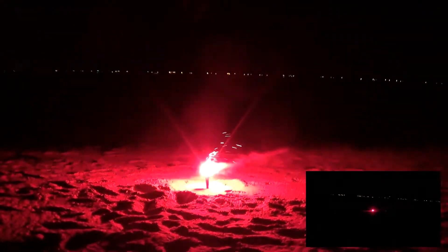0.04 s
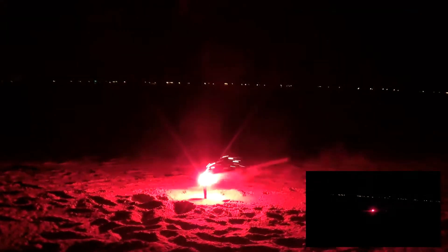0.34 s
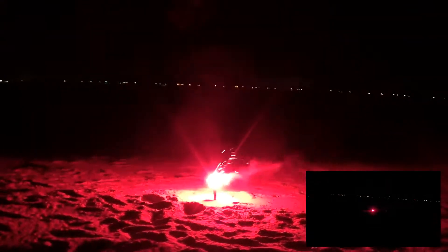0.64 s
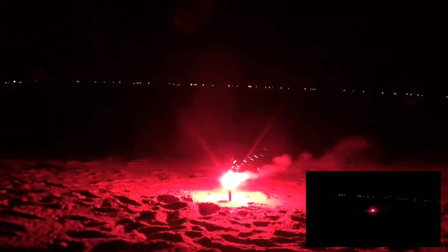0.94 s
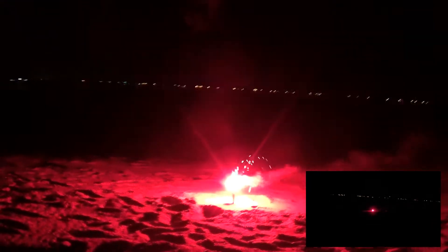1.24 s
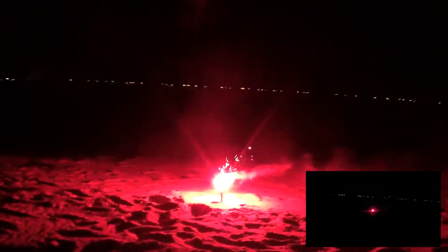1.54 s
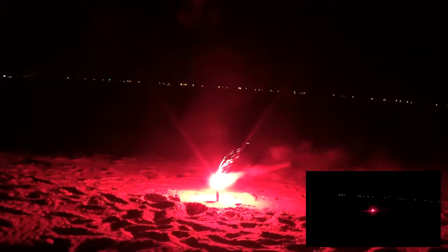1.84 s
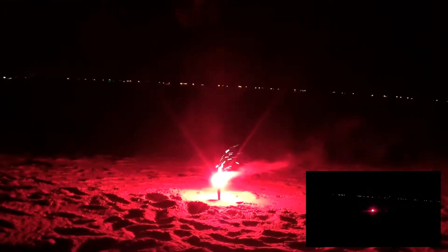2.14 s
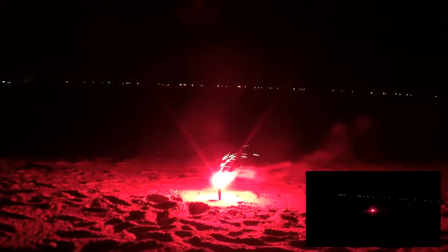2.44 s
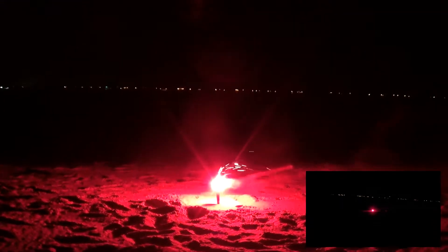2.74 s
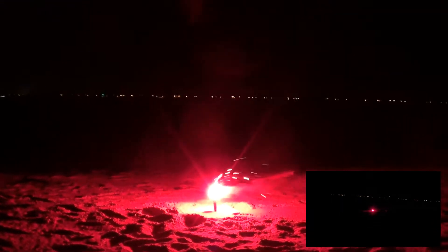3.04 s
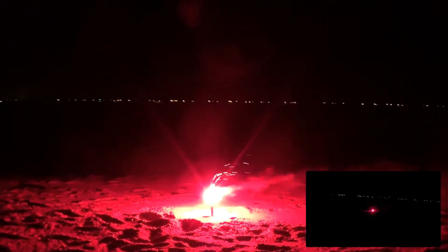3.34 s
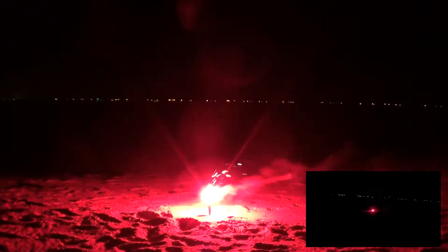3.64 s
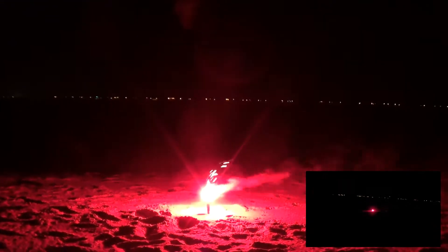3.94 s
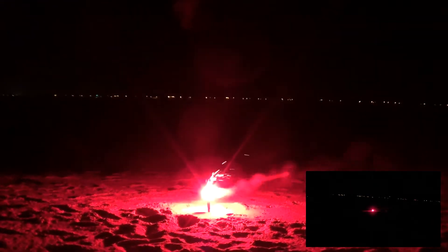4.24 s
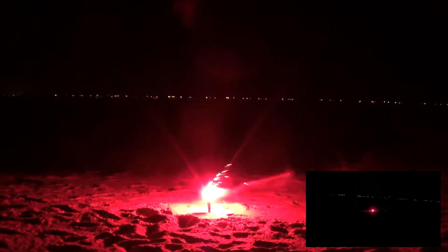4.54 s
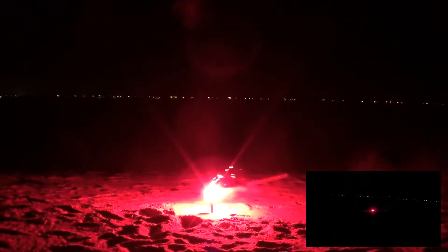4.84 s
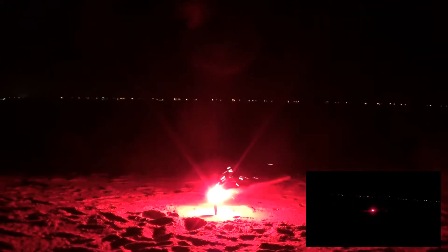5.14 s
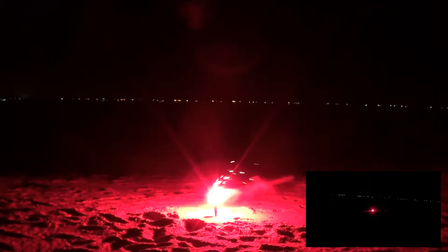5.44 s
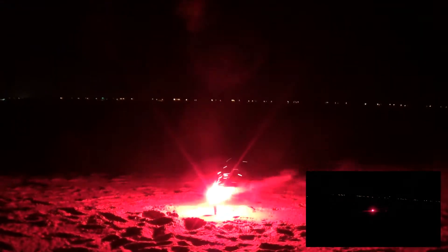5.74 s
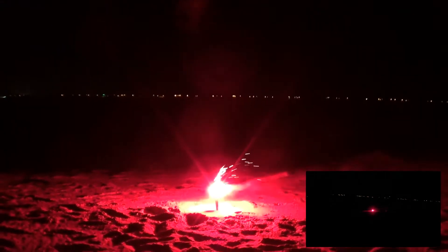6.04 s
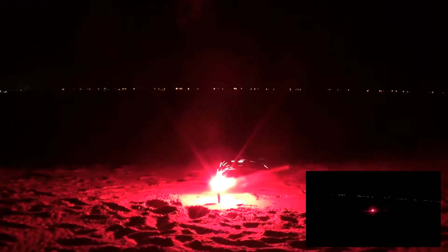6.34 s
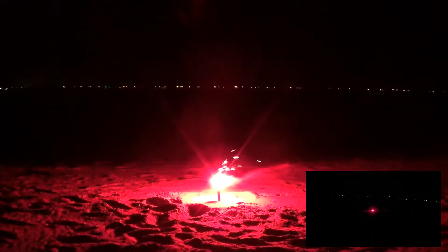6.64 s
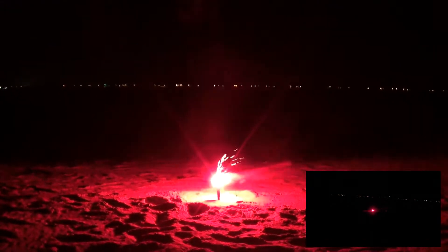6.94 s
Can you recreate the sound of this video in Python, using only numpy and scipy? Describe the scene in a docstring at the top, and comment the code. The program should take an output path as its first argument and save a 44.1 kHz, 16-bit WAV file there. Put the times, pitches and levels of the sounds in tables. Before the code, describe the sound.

A flare burns straight ahead, a few metres away on open sand, for about seven seconds. It gives a continuous rushing hiss with a fine, high fizz, brief sizzling flurries and sharp, irregular pops, thickest between about 1.6 and 3 seconds. Low wind rumble buffets the microphone in uneven gusts, spreading wide around the centred flare. In the first second there are two tiny gritty scuffs and a faint, breathy whistle that peaks near 0.7 seconds. A strong gust hits at about 1 second. The wind is heaviest from 3 to 5 seconds, peaking near 3.3 and 4.2 seconds with a grainy, rasping edge, while the hiss sinks slightly and the pops thin out. After about 5.8 seconds the wind drops to a few short thumps, and the hiss and crackle come forward again. One last brief gust bumps the microphone at 7 seconds.

```python
"""Hiss and fizz of a road flare a few metres ahead, over low wind rumble; open sand, night.
The gas jet hisses and sounds the tube mouth. Molten slag fizzes, boils up in flurries, spits sharp pops.
Gusts buffet the two microphone ports: the harder they blow, the higher the rumble reaches, until it
rasps. A faint whistle and two brief scuffs sound early on. A limiter ducks the mix on big thumps."""
import sys
import numpy as np
from scipy import signal
from scipy.fft import rfft, irfft
from scipy.io import wavfile
from scipy.ndimage import uniform_filter1d, minimum_filter1d

SR = 44100
rng = np.random.default_rng(int(sys.argv[2]) if len(sys.argv) > 2 else 0)


def inscribe(sig):
    """Save sig as 16-bit PCM at rate SR to the path in sys.argv[1].

    A 1-D sig is mono; a 2-D sig holds one channel per row.
    Samples are clipped to [-1, 1] before scaling.
    """
    pcm = np.round(np.clip(np.atleast_2d(sig).T, -1, 1) * 32767)
    wavfile.write(sys.argv[1], SR, pcm.astype(np.int16))


N = 312228
TIME_S = np.arange(N) / SR
STIFF_GUST_DB = -28.5   # reference buffeting

# gusts at the ports: start t/s, length/s, buffeting/dB, extra thump/dB
GUSTS = [(-0.02, 0.12, -46.5, 6.5), (0.105, 0.032, -36, -4.5), (0.235, 0.084, -29, 1.5),
         (0.341, 0.13, -25, -0.5), (0.512, 0.065, -30, -1), (0.774, 0.156, -30, 1.5),
         (0.919, 0.19, -22.5, -0.5), (1.137, 0.201, -31, -0.5), (1.384, 0.22, -33, 1.5),
         (1.676, 0.087, -34, 0.5), (1.795, 0.022, -39.0, 2), (1.927, 0.149, -27.5, 1.5),
         (2.108, 0.26, -29, 0), (2.267, 0.45, -27.5, 1), (2.794, 0.074, -24, -0.5),
         (3.021, 0.21, -27.0, -0.5), (3.177, 0.24, -18.5, -2.5), (3.438, 0.43, -24.5, -3.5),
         (4.011, 0.053, -28.5, -1.5), (4.116, 0.27, -21.5, -0.5), (4.41, 0.45, -25.0, -0.0),
         (4.752, 0.24, -26, -1), (4.987, 0.19, -37, 0), (5.178, 0.039, -30, 0), (5.287, 0.093, -32, -2.5),
         (5.388, 0.13, -29.5, 2), (5.528, 0.047, -32, -2.5), (5.618, 0.025, -36.5, -7),
         (5.695, 0.035, -23, -5), (5.775, 0.014, -28, 4), (5.855, 0.028, -44.5, -2.5),
         (6.202, 0.028, -34.5, 7), (6.295, 0.14, -51.5, 6.5), (6.335, 0.025, -35.5, -15.5),
         (6.575, 0.035, -41.5, 6), (6.729, 0.07, -39.5, 4), (6.872, 0.12, -43, -1),
         (6.982, 0.038, -25.5, 2)]
# eddy noise in a strong gust: f/Hz, density/dB
EDDY_SPECTRUM = [(25, -11), (60, -1.5), (130, 3), (220, -1.5), (330, -7), (500, -17), (900, -29),
                 (1800, -39.5), (2600, -44.5), (3600, -57), (6000, -61)]
# wind width: f/Hz, side minus mid/dB
WIND_WIDTH = [(60, -10), (120, -7), (200, -3.5), (330, 2), (550, 3.5), (1300, 4.5), (2500, -45),
              (4000, -58), (7000, -18)]
# sharpest eddies across the ports: centre t/s, level/dB, length/s, top f/Hz
SHARP_EDDIES = [(.261, -33, 0.01, 1900), (.41, -25.5, .007, 2280), (.452, -32, .01, 2280),
                (.951, -25.5, 0.015, 1970), (.989, -28, 0.011, 2680), (1.048, -24.5, 0.041, 3470),
                (2.021, -30, 0.013, 2540), (2.068, -35, 0.013, 2400), (2.401, -26, 0.0051, 2580),
                (2.864, -28, 0.023, 1990), (3.125, -27, 0.0085, 2320), (3.257, -30, 0.028, 3160),
                (3.295, -28.5, 0.029, 3570), (3.32, -25, 0.0065, 3880), (3.363, -27, 0.013, 4900),
                (3.407, -27, 0.013, 4100), (3.614, -25, 0.023, 3040), (3.75, -26.5, 0.021, 3180),
                (4.066, -28.5, 0.01, 2450), (4.29, -32, 0.24, 3050), (4.767, -30, 0.026, 3000),
                (4.857, -27, 0.0055, 2620), (5.472, -26, 0.019, 2000), (6.224, -32, 0.0045, 1520)]
# gritty scuffs: centre t/s, level/dB, length/s
SCUFFS = [(0.416, -35.5, .018), (0.71, -33, 0.0053)]
# hiss envelope: t/s, level/dB
HISS_LEVELS = [(0.03, -39.5), (0.75, -38.5), (0.97, -40.5), (1.18, -42.5), (1.34, -42.5), (1.75, -40.5),
               (2.51, -41.5), (2.94, -42.5), (3.12, -40), (3.29, -46), (3.94, -45), (4.47, -46.5),
               (5.95, -43), (6.35, -41), (6.5, -42), (7.05, -39.5)]
# brief hiss dips: centre t/s, gain/dB, length/s
HISS_DIPS = [(1.075, -5, 0.068), (2.47, -8, 0.018), (3.164, -6.5, 0.044), (3.894, -6, 0.027),
             (4.575, -8, 0.036)]
# gas jet: f/Hz, density/dB
JET_SPECTRUM = [(150, -28), (500, 2.5), (1000, -1), (1600, -1.5), (2600, 1.5), (3900, 0), (4700, -4.5),
                (6000, -6.5), (7200, -4), (8300, 0.5), (9300, 1), (10500, 0), (12500, -14), (16000, -24)]
# flare wash from the sides: f/Hz, density/dB
WASH_SPECTRUM = [(300, 9.5), (1000, 4), (2000, 1), (3000, -2), (4000, 4), (5000, -20), (8000, -50),
                 (11000, -46)]
# one burst in the slag: f/Hz, density/dB
SPARK_SPECTRUM = [(400, -30), (2000, -10.5), (4500, -11.5), (6000, -8), (7200, -5.5), (8300, 1),
                  (9300, 5.5), (10500, 0.5), (12500, -5), (16000, -20)]
# slag boiling up: centre t/s, level/dB
FLURRIES = [(.21, -32), (1.495, -36), (1.655, -32), (1.952, -32), (2.584, -31), (2.627, -33),
            (2.703, -27.5), (2.982, -31.5), (3.693, -35.5), (4.125, -39), (4.23, -36), (5.071, -34),
            (5.464, -32), (5.805, -33.5), (6.574, -28)]
# loudest slag spits: t/s, peak level/dB
POPS = [(0.167, -17), (0.2414, -18), (0.2713, -17), (0.4614, -17), (0.5851, -17), (0.632, -17),
        (0.7083, -15), (1.1727, -17), (1.3428, -17), (1.6008, -15), (1.6596, -17), (1.8577, -13),
        (2.0288, -18), (2.1994, -15), (2.2298, -12), (2.2438, -13), (2.3506, -16), (2.4503, -16),
        (2.592, -16), (2.7028, -17), (2.796, -15), (2.8474, -15), (2.9836, -17), (3.055, -14),
        (3.6935, -20), (3.8482, -21), (3.9669, -12), (4.0377, -19), (4.125, -21), (4.2313, -23),
        (4.6254, -20), (5.1522, -19), (5.3717, -19), (5.441, -14), (5.672, -19), (5.8032, -15),
        (6.1584, -17), (6.4862, -15), (6.5525, -17), (6.5819, -15), (6.8483, -16), (6.9112, -13)]


def from_db(db):
    """Decibels to gain."""
    return 10 ** (np.asarray(db) / 20)


def unit_rms(x):
    """Scale to rms 1."""
    return x / np.sqrt(np.mean(x ** 2) + 1e-20)


def at_hz(spectrum, hz):
    """Interpolate over log frequency."""
    knots_hz, values_db = np.transpose(spectrum)
    return np.interp(np.log(np.maximum(hz, 1)), np.log(knots_hz), values_db)


def swell(centre_s, length_s):
    """Bell envelope, height 1."""
    return np.exp(-2 * np.minimum(((TIME_S - centre_s) / length_s) ** 2, 20))


def drift(rate_hz, hop=40):
    """Slow random wander, rms 1."""
    pole = np.exp(-2 * np.pi * hop * rate_hz / SR)
    white = rng.standard_normal(N // hop + 2002)
    slow = signal.lfilter([1], [1, -2 * pole, pole * pole], white)[2000:]
    return np.interp(np.arange(N) / hop, np.arange(len(slow)), unit_rms(slow))


def butter(order, hz, kind="low"):
    """Butterworth sections."""
    return signal.butter(order, hz, kind, fs=SR, output="sos")


def response(spectrum, size=1024):
    """Minimum-phase impulse response of a spectrum."""
    bins_hz = np.arange(size // 2 + 1) * SR / size
    cepstrum = irfft(np.log(from_db(at_hz(spectrum, bins_hz))))
    cepstrum[1:size // 2] *= 2
    cepstrum[size // 2 + 1:] = 0
    return irfft(np.exp(rfft(cepstrum)))


def coloured(x, spectrum):
    """Filter by a spectrum; rms 1."""
    return unit_rms(signal.oaconvolve(x, response(spectrum))[:N])


def resonant_noise(centre_hz, width_hz):
    """Noise band with movable centre; rms 1."""
    real, imag = signal.sosfilt(butter(2, width_hz / 2), rng.standard_normal((2, N)))
    phase = 2 * np.pi * np.cumsum(centre_hz * np.ones(N)) / SR
    return unit_rms(real * np.cos(phase) + imag * np.sin(phase))


def stereo(mid, side, side_db):
    """Mid/side to left/right."""
    return mid + from_db(side_db) * side * np.array([[1], [-1]])


def buffeting(attack_s=0.027, release_s=0.039, breeze_db=-57):
    """Wind force and extra thump, both in dB: gusts rise, hold and decay over a breeze."""
    power, thump_db = from_db(breeze_db) ** 2, 0
    for start_s, length_s, level_db, extra_db in GUSTS:
        attack = np.clip((TIME_S - start_s) / attack_s, 0, 1)
        release = np.exp(-np.clip((TIME_S - start_s - length_s) / release_s, 0, 20))
        power = power + (from_db(level_db) * attack * release) ** 2
        thump_db = thump_db + extra_db * attack * release
    return 10 * np.log10(power), thump_db


def wind_rumble(buffet_db, thump_db, stiff_rumble_db=-18.5, strong_db=-11, patchy_db=1.5, top_hz=3570):
    """Half-octave eddy bands; the small, high eddies swell most as the flow quickens."""
    rumble_db = stiff_rumble_db + thump_db + 0.5571 * (buffet_db - STIFF_GUST_DB)
    force_db = np.clip(buffet_db - rumble_db - strong_db, -16, 6)
    flutter_db = 0.98 * drift(40.5) + 2.0 * drift(146)   # lumps of air passing the ports
    edges_hz = 20 * 2 ** (np.arange(18) / 2)
    centres_hz = np.sqrt(edges_hz[1:] * edges_hz[:-1])
    power = from_db(at_hz(EDDY_SPECTRUM, centres_hz)) ** 2 * np.diff(edges_hz)
    band_gains = np.sqrt(power / power[centres_hz < 300].sum())
    white, rumble = rng.standard_normal((2, 2, N)), 0
    for k, hz in enumerate(centres_hz):
        mid, side = signal.sosfilt(butter(2, edges_hz[k:k + 2], "band"), white[k % 2])
        band = stereo(unit_rms(mid), unit_rms(side), at_hz(WIND_WIDTH, hz))
        smallness = np.interp(np.log(hz), np.log([130, 480]), [0, 1]) + 0.15 * max(np.log2(hz / 600), 0)
        surge_db = smallness * force_db + (0.62 + smallness) * flutter_db
        level_db = rumble_db + surge_db + patchy_db * drift(18.7)
        rumble = rumble + band_gains[k] * from_db(level_db) * band
    return signal.sosfilt(butter(6, top_hz), rumble)


def lesser_eddies(buffet_db, count=190, length_s=0.015, scatter_db=1.5):
    """Random rows like SHARP_EDDIES; louder and brighter in harder wind."""
    centres = ((np.arange(count) + rng.random(count)) * N / count).astype(int)
    over_db = buffet_db[centres] - STIFF_GUST_DB
    level_db = -42.5 + 1.32 * over_db + scatter_db * rng.standard_normal(count)
    top_hz = np.clip(2090 * 2 ** (0.05 * over_db), 1200, 6000)
    return [(s, db, length_s, hz) for s, db, hz in zip(centres / SR, level_db, top_hz)]


def wind_rasps(buffet_db, trim_db=-1.0, low_hz=900, grain_db=5.0, size=8192):
    """Each eddy shreds into a short, grainy rush with its own top frequency."""
    rasps = np.zeros((2, N + 2 * size))
    offset_s = (np.arange(size) - size // 2) / SR
    for centre_s, level_db, length_s, top_hz in list(SHARP_EDDIES) + lesser_eddies(buffet_db):
        edge = butter(7, top_hz)
        body = butter(1, [low_hz, max(top_hz * 0.72, low_hz * 1.3)], "band")
        mid, side = unit_rms(signal.sosfilt(np.vstack([edge, body]), rng.standard_normal((2, size))))
        bell = np.exp(-2 * (offset_s / length_s) ** 2)
        start = int(centre_s * SR) + size // 2
        rasps[:, start:start + size] += from_db(level_db + trim_db) * bell * stereo(mid, side, side_db=0)
    grain = unit_rms(from_db(grain_db * drift(204)))
    return rasps[:, size:size + N] * grain


def whistle(peak_s=0.68, peak_db=-41.5, rise_db_per_s=18, fall_db_per_s=88):
    """Faint, breathy noise band; swells, then fades."""
    after_s = TIME_S - peak_s
    level_db = peak_db + np.minimum(rise_db_per_s * after_s, -fall_db_per_s * after_s)
    mid, side = (resonant_noise(centre_hz=1070, width_hz=180) for _ in range(2))
    return from_db(level_db) * stereo(mid, side, side_db=-5)


def scuffs(band_hz=(3000, 8500)):
    """Short rubs of noise, wider and duller than the pops."""
    envelope = sum(from_db(level_db) * swell(s, length_s) for s, level_db, length_s in SCUFFS)
    mid, side = unit_rms(signal.sosfilt(butter(3, band_hz, "band"), rng.standard_normal((2, N))))
    return envelope * stereo(mid, side, side_db=-5)


def hiss_level_db(trim_db=-3):
    """Slow hiss envelope with brief dips."""
    slow_db = np.interp(TIME_S, *np.transpose(HISS_LEVELS))
    dips_db = sum(gain_db * swell(s, length_s) for s, gain_db, length_s in HISS_DIPS)
    return slow_db + trim_db + dips_db


def gas_jet(hiss_db, rush_db=4.0, sputter_db=1.5,
            mouth_hz=3473, sink_hz_per_s=97, mouth_db=-5, growth_db_per_s=0.66):
    """Hot gas rushes out unevenly; the mouth resonance sinks and grows as the tube burns hollow."""
    rush = coloured(rng.standard_normal(N), JET_SPECTRUM)
    rush *= from_db(rush_db + sputter_db * drift(28))
    mouth = resonant_noise(mouth_hz - sink_hz_per_s * TIME_S, width_hz=820)
    mouth *= from_db(mouth_db + growth_db_per_s * TIME_S)
    wash = coloured(rng.standard_normal(N), WASH_SPECTRUM)
    return from_db(hiss_db) * stereo(rush + mouth, wash, side_db=-11)


def slag_fizz(hiss_db, bursts_per_s=650, clump_db=1.5, spread_db=4.0,
              over_hiss_db=1.5, flurry_trim_db=-2.5, flurry_s=0.013):
    """Gas pockets burst in the slag, many small, few large; stronger in a flurry."""
    power = from_db(hiss_db + over_hiss_db) ** 2
    for centre_s, level_db in FLURRIES:
        power = power + from_db(level_db + flurry_trim_db) ** 2 * swell(centre_s, flurry_s)
    bursts = rng.random(N) < bursts_per_s * from_db(clump_db * drift(45)) / SR
    sizes = from_db(spread_db * np.minimum(rng.exponential(1, N), 4.5))
    signs = rng.choice([-1, 1], N)
    return np.sqrt(power) * coloured(bursts * sizes * signs, SPARK_SPECTRUM)


def slag_pops(trim_db=-1.3, tail_db=-26, tail_decay_s=0.0025, size=512):
    """Big spits: one sharp crack each, then a few ms of decaying scatter."""
    clicks = np.zeros(N + size)
    decay = np.exp(-np.arange(size) / (tail_decay_s * SR))
    for start_s, peak_db in POPS:
        spit = from_db(tail_db) * rng.standard_normal(size) * decay
        spit[0] = 1   # the crack
        start = int(start_s * SR)
        clicks[start:start + size] += from_db(peak_db + trim_db) * spit
    crack = response(SPARK_SPECTRUM)
    return signal.oaconvolve(clicks, crack / np.abs(crack).max())[:N]


def scene():
    """Flare dead ahead, wind all around."""
    hiss_db = hiss_level_db()
    buffet_db, thump_db = buffeting()
    flare = gas_jet(hiss_db) + slag_fizz(hiss_db) + slag_pops()
    wind = wind_rumble(buffet_db, thump_db) + wind_rasps(buffet_db)
    return flare + wind + whistle() + scuffs()


def limiter(x, threshold_db=-11.0, release_db_per_s=260, slope=0.74, size=129):
    """Gain drops just ahead of each big thump, then recovers; the hiss ducks too."""
    level_db = 20 * np.log10(np.abs(x.mean(axis=0)) + 1e-9)
    excess_db = np.maximum(level_db - threshold_db, 0)
    fall_db = release_db_per_s * TIME_S
    held_db = np.maximum.accumulate(excess_db + fall_db) - fall_db
    smooth_db = uniform_filter1d(minimum_filter1d(-held_db, size), size)
    return x * from_db(slope * smooth_db)


def record(dry):
    """Limiter, then steep 16 kHz low-pass."""
    lowpass = signal.ellip(10, 0.1, 80, 16000, fs=SR, output="sos")
    return signal.sosfilt(lowpass, limiter(dry))


dry = scene()
out = record(dry)
inscribe(out)
```